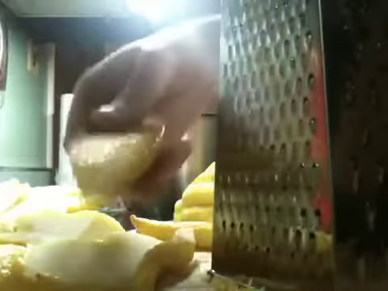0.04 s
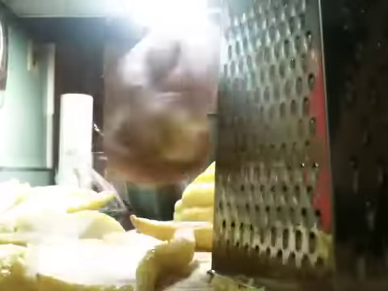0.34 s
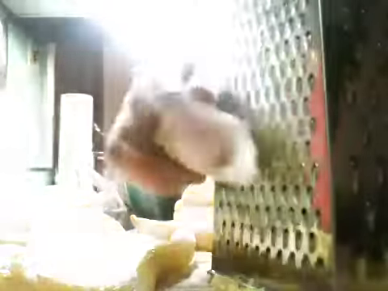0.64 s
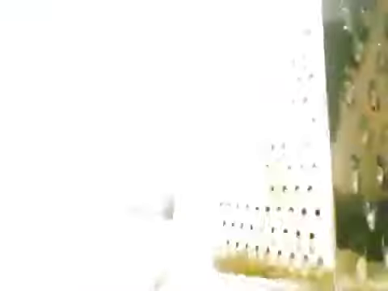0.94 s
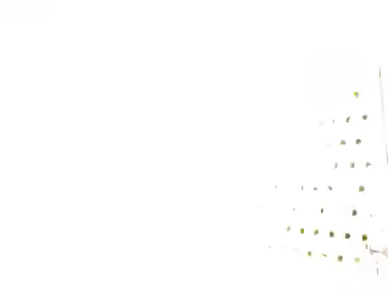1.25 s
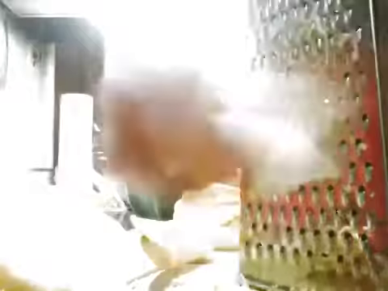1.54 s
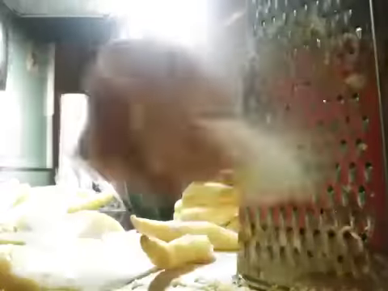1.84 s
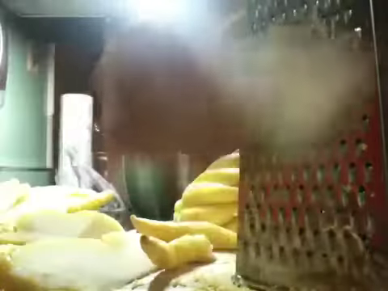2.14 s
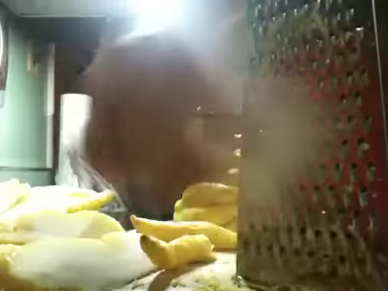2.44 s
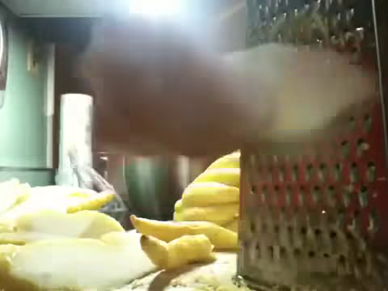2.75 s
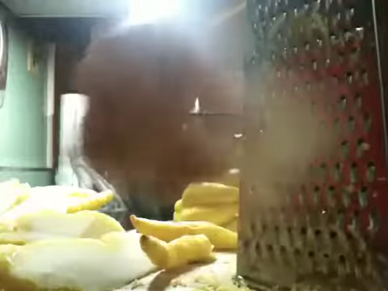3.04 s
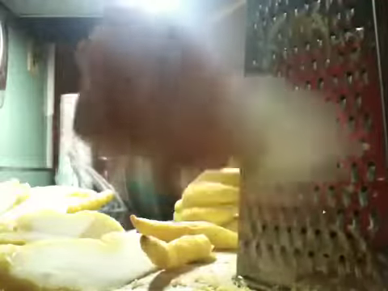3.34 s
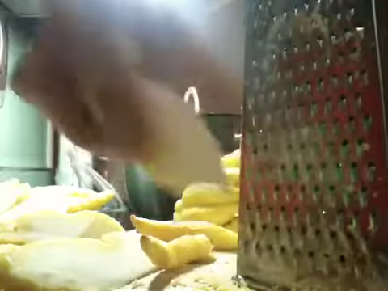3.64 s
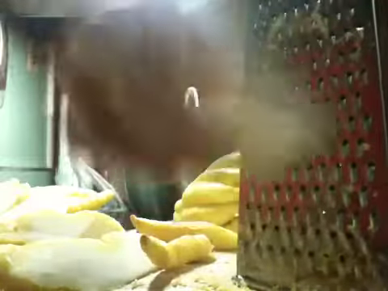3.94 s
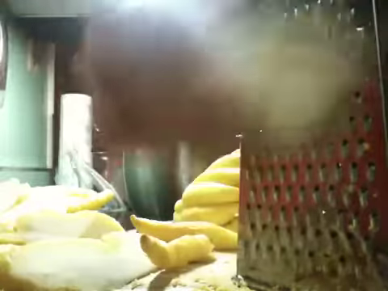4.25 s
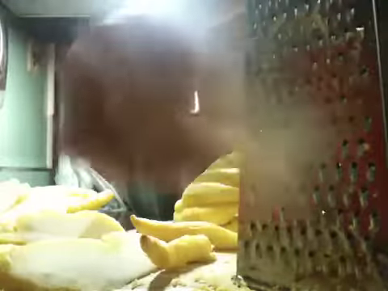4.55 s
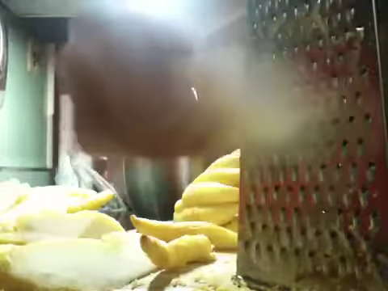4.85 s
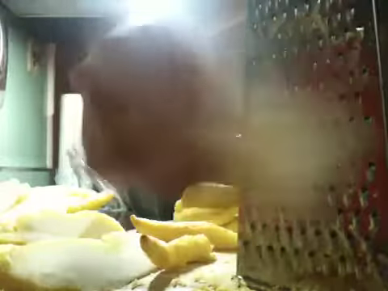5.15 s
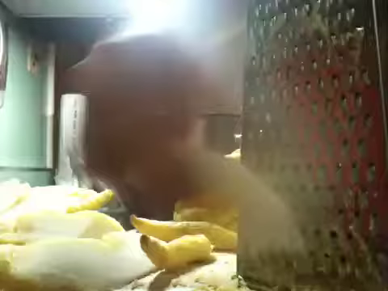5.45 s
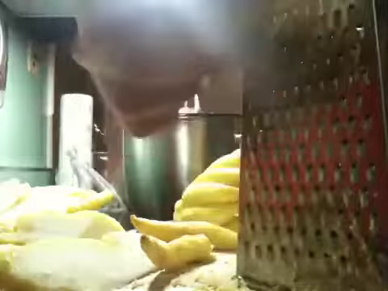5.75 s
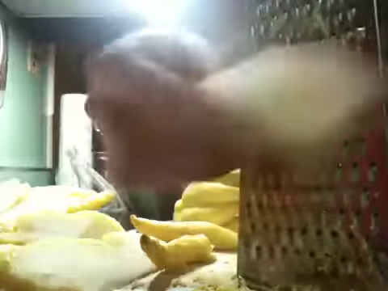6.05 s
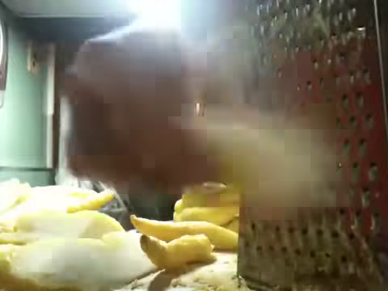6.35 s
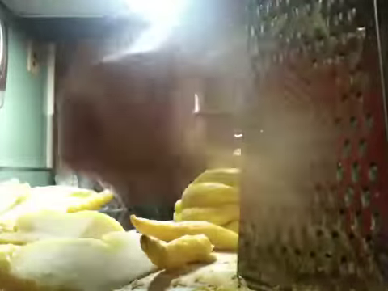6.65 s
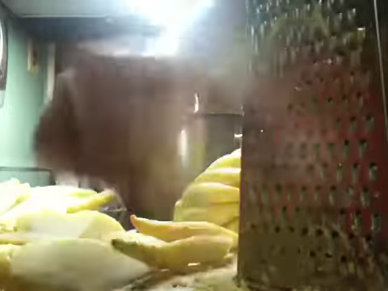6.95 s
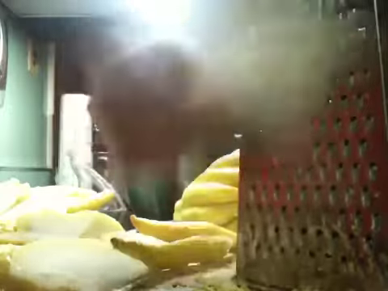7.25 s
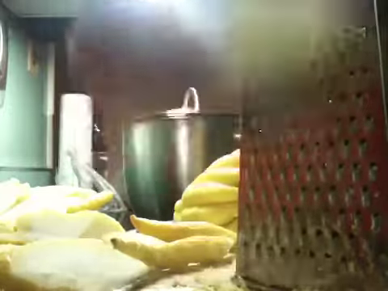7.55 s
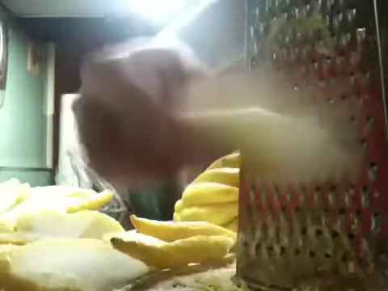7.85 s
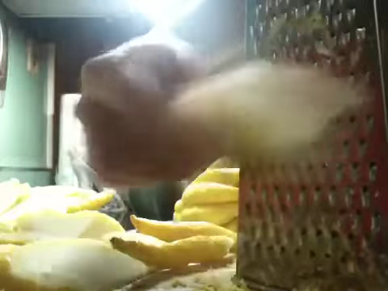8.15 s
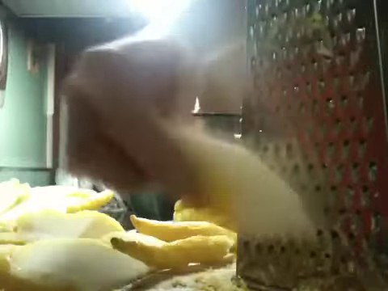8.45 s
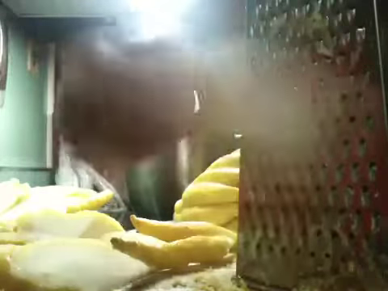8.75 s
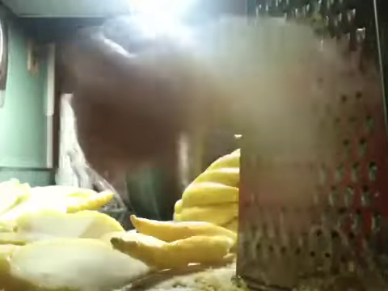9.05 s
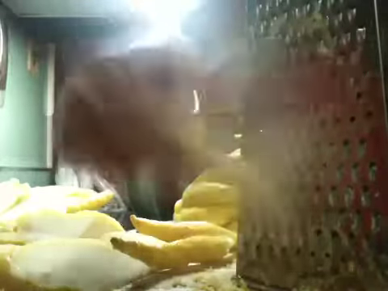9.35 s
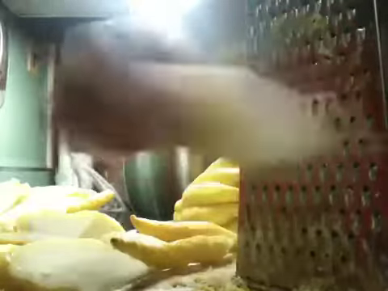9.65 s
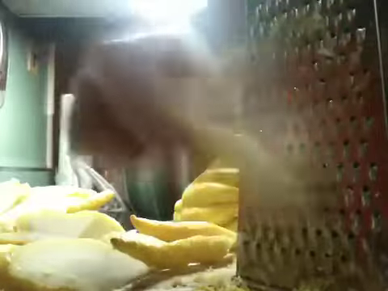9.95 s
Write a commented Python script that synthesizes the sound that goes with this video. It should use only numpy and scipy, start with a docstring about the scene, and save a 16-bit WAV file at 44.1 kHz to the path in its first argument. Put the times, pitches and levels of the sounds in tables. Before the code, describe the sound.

Citrus peel is rasped against a steel box grater in quick strokes, then single swipes, close up over a faint appliance hum.

```python
"""An appliance hums in a small kitchen; then, close to one microphone, citrus peel is zested on a steel
box grater on the counter: rubbed up and down without leaving the steel, then mostly in single swipes.
Each row of teeth tears the rind in a spray of tiny fractures; the thin walls ring, and the tugging
makes the whole box thrum. Down strokes cut and sound bright; up strokes slide over the backs of the
teeth and knock hollow. The room answers softly behind the direct sound."""
import sys
import numpy as np
from scipy import signal
from scipy.fft import rfft, irfft
from scipy.io import wavfile
from scipy.ndimage import map_coordinates

SR = 44100
rng = np.random.default_rng(int(sys.argv[2]) if len(sys.argv) > 2 else 0)


def int16_out(signal):
    """Quantize to a 16-bit WAV file."""
    q = np.round(np.clip(np.atleast_2d(signal).T, -1, 1) * 32767)
    wavfile.write(sys.argv[1], SR, q.astype(np.int16))


N = 440118
SPAN = 16384  # samples for one stroke and its ring
T, HZ = np.arange(SPAN) / SR, np.fft.rfftfreq(SPAN, 1 / SR)

# broad colour of the rasp at the teeth: f/Hz, level/dB
RASP_COLOUR = [(500, -67), (1300, -7), (2000, -6), (3200, -0.5), (4200, 0), (6000, -1.5), (7700, -2.5),
               (9500, -6), (10900, -9), (12200, -6.5), (15500, -11.5)]
# broad colour of the clattering wall: f/Hz, level/dB
CLATTER_COLOUR = [(250, -48), (560, 0), (750, -1), (1100, -3), (1450, -4), (1680, -12), (2300, -11),
                  (5000, -43)]


def amp(db):
    return 10 ** (np.asarray(db) / 20)


def unit(x):
    return x / np.sqrt(np.mean(x ** 2) + 1e-30)


def along(points, hz):
    """Read (f/Hz, value) points at hz, on a log axis."""
    f, values = np.transpose(points)
    return np.interp(np.log(hz + 1), np.log(f + 1), values)


def wobble(rate, size):
    """A smooth random curve, rate knots a second."""
    knots = rng.standard_normal(size // 100)
    return map_coordinates(knots, [np.arange(size) * rate / SR], mode="wrap")


def through(x, response):
    """x sent through an impulse response, cut to the length of x."""
    return signal.fftconvolve(x, response)[:len(x)]


def add(track, start_s, x):
    part = track[round(start_s * SR):][:len(x)]
    part += x[:len(part)]


def room_tone(air_db, hum_gain_db):
    """Steady kitchen air and, behind the grater, the slightly unsteady hum of an appliance."""
    # spectrum of the room noise: f/Hz, level/dB
    air_colour = [(15, -74), (25, -56), (113, -17), (156, -13), (188, -5.5), (274, -12.5), (305, -5),
                  (389, -12), (433, -8.5), (509, -19), (826, -22.5), (895, -25.5), (1140, -25.5),
                  (1490, -29), (15500, -36.5)]
    # tones of the appliance: f/Hz, level/dB
    hum_tones = [(60, -106), (120, -84), (197, -78.5), (302, -72), (312.6, -70), (414.9, -95),
                 (432.9, -75.5), (1001, -93), (1061, -97), (1120, -85), (1179, -87.5)]
    hz, t = np.fft.rfftfreq(N, 1 / SR), np.arange(N) / SR
    air = unit(irfft(rfft(rng.standard_normal(N)) * amp(along(air_colour, hz)), N))
    hum = np.zeros(N)
    for f, db in hum_tones:
        phase = 2 * np.pi * (f * t + rng.random()) + 0.77 * wobble(4.9, N)
        hum += amp(db) * np.sqrt(2) * np.sin(phase)
    return amp(air_db) * air + amp(hum_gain_db) * hum


def kitchen(x, wet_db, delay_s=0.0091):
    """The direct sound reaches the microphone first, then the room's answer, shorter in the treble."""
    # reverberation of the kitchen: f/Hz, t60/s
    decay_times = [(150, 0.5), (400, 0.41), (1000, 0.21), (3000, 0.31), (8000, 0.3), (15000, 0.051)]
    hz, t, noise = signal.stft(rng.standard_normal(SPAN), SR, nperseg=256)
    decay = amp(-60 * t / along(decay_times, hz)[:, None])
    tail = signal.istft(noise * decay, SR, nperseg=256)[1][:SPAN]
    tail *= T > delay_s
    return x + amp(wet_db) * through(x, tail / np.linalg.norm(tail))


def squeaks():
    """The wet rind sticks and slips on the steel for a few rough cycles, too short to become a note."""
    # squeaks: t/s, f/Hz, length/s, relative level/dB
    slips = [(4.339, 1270, 0.015, -54), (5.979, 1307, 0.01, -40), (6.658, 1200, 0.02, -41.5),
             (6.893, 1350, 0.012, -48.5)]
    track = np.zeros(N)
    for start, hz, length, db in slips:
        unsteady_hz = hz * (1 + 0.1 * wobble(350, SPAN))
        slip = np.sin(2 * np.pi * np.cumsum(unsteady_hz) / SR)
        swell = np.sqrt(np.abs(np.sin(np.pi * np.minimum(T / length, 1))))
        add(track, start, kitchen(amp(db + 5) * swell * slip, wet_db=-10))
    return track


def grater(colour, bass_db=0, bass_hz=225, grip_db=1.5):
    """Impulse response of the steel; the pressing peel damps its resonances differently at each touch."""
    # resonances of the grater: f/Hz, width/Hz, lift/dB
    resonances = [(123.4, 11, 3), (203, 100, -1), (253, 69, 4.5), (316, 14, 6.5), (389, 8.8, 7.5),
                  (437.6, 56, 4), (770, 74, 5.5), (959, 54, 11), (1045, 20, 6.5), (1228, 67, 7),
                  (1402, 15, 11.5), (1510, 74, 10), (1767, 57, 11.5), (2133, 23, 8), (2472, 38, 11),
                  (2980, 320, 8), (3467, 94, 11), (3800, 32, 10), (4500, 100, 6.5), (4830, 26, 8.5),
                  (5200, 71, 7.5), (5940, 270, 5.5), (6170, 200, 5.5), (6900, 260, 3.5), (7730, 49, 5.5)]
    power = np.ones(len(HZ))
    for f, width, db in resonances:
        peak = amp(db + grip_db * rng.standard_normal()) ** 2 - 1
        power += peak / (1 + (2 * (HZ - f) / width) ** 2)
    bass_shelf = amp(bass_db / (1 + (HZ / bass_hz) ** 8))
    magnitude = amp(along(colour, HZ)) * bass_shelf * np.sqrt(np.maximum(power, 0.5))
    # minimum phase: the steel rings only after it is touched
    cepstrum = irfft(np.log(magnitude))
    fold = 1 + np.sign(SPAN / 2 - np.arange(SPAN))
    fold[0] = 1
    return irfft(np.exp(rfft(cepstrum * fold)))


def shimmer(x, t60, share, paths=4, dwell_s=0.007):
    """Bending waves scatter round the perforated sheet, differently from each tooth the peel passes."""
    tails = rng.standard_normal((paths, SPAN // 4)) * amp(-60 * T[:SPAN // 4] / t60)
    tails *= share / np.linalg.norm(tails, axis=1, keepdims=True)
    tails[:, 0] += 1  # the direct wave
    touched = (T // dwell_s) % paths == np.arange(paths)[:, None]
    return signal.fftconvolve(x * touched, tails, axes=1).sum(0)[:SPAN]


def teeth(rate, uneven, scatter_db, release_s):
    """Force on the teeth: the rind catches on one row after another, and each catch tears away."""
    rows_per_s = rate * np.exp(uneven * wobble(70, SPAN))
    rows_passed = np.floor(rng.random() + np.cumsum(rows_per_s) / SR)
    catches = np.diff(rows_passed, prepend=0) > 0
    return through(catches * amp(scatter_db * rng.standard_normal(SPAN)), np.exp(-T / release_s))


def fractures(rate, scatter_db):
    """Tiny cracks of bursting rind cells, rate a second."""
    cracks = (rng.random(SPAN) < rate / SR) * rng.choice([-1, 1], SPAN)
    return cracks * amp(scatter_db * rng.standard_normal(SPAN))


def pressure(rise_s, hold_s, fall_s, landing_db, lag_s=0):
    """The soft peel lands, the hand bears down, holds and lets go, easing by 20 dB in fall_s."""
    t = np.maximum(T - lag_s * np.minimum(T / rise_s, 1), 0)
    bearing_db = landing_db * np.maximum(1 - t / rise_s, 0) ** 2
    easing_db = -20 * (np.maximum(t - rise_s - hold_s, 0) / fall_s) ** 2
    return amp(bearing_db + easing_db) * (1 - np.exp(-T / 0.0025))


def rubbed(push, grain, body, t60, share):
    """Grain under the hand's push rings the steel, with as much energy as the push carries."""
    ring = through(shimmer(push * grain, t60, share), body)
    return unit(ring) * np.sqrt(np.mean(push ** 2))


def spray(push):
    """Zest oil spits from bursting cells: a dry, bright sizzle, straight through the air."""
    # spectrum of the sizzle: f/Hz, level/dB
    sizzle_colour = [(2000, -40), (5000, -7), (8000, 4), (12000, -5.5), (15500, -8.5)]
    droplets = fractures(rate=18000, scatter_db=1.5)
    return push * unit(irfft(rfft(droplets) * amp(along(sizzle_colour, HZ))))


def snags():
    """A tooth snags hard and rips free in one short burst of fractures."""
    # snags: t/s, level/dB
    rips = [(1.362, -38.5), (1.404, -36.5), (1.449, -31), (1.615, -40.5), (1.668, -32), (1.876, -28.5),
            (1.892, -34.5), (2.311, -38), (2.521, -41), (2.567, -34), (2.956, -41), (3.147, -47),
            (4.091, -55), (4.378, -39), (4.398, -38.5), (4.578, -36.5), (4.81, -38.5), (4.858, -46),
            (5.052, -34), (5.073, -38.5), (5.291, -38), (5.313, -44), (5.48, -40), (5.512, -31),
            (6.212, -39), (6.446, -32), (6.663, -33), (7.386, -35.5), (7.418, -30), (7.876, -35),
            (8.291, -32), (9.178, -41), (9.387, -38)]
    track = np.zeros(N)
    rip = np.exp(-T / 0.0039) * (1 - np.exp(-T / 0.00051))
    for start, db in rips:
        burst = fractures(rate=12000, scatter_db=2)
        crack = rubbed(rip, burst, grater(RASP_COLOUR), t60=0.026, share=1.3)
        knock = rubbed(rip, burst, grater(CLATTER_COLOUR), t60=0.05, share=0.69)
        snag = crack + amp(-10.5) * knock + amp(-26) * spray(rip)
        add(track, start, amp(db) * kitchen(snag, wet_db=-18.5))
    return track


def flick(db):
    """The peel slips off the teeth; let go, the wall rings hollow for a moment."""
    # modes of the freed wall: f/Hz, level/dB, t60/s
    wall_modes = [(237, -20, 0.16), (306, -7, 0.18), (367.5, -3, 0.14), (425.7, 1.5, 0.13),
                  (507, -2.5, 0.11), (657, -11, 0.094), (783, -8.5, 0.23), (948, -23, 0.046)]
    ring = np.zeros(SPAN)
    for hz, mode_db, t60 in wall_modes:
        decay = amp(mode_db + rng.normal(0, 1.1) - 60 * T / t60)
        ring += decay * np.sin(2 * np.pi * (hz * T + rng.random()))
    return kitchen(amp(db) * ring * (1 - np.exp(-T / 0.00087)), wet_db=-18.5)


def bass_at(t):
    """How deep the box thrums at this moment, in dB."""
    # bass in the thrum, drifting from stroke to stroke: t/s, level/dB
    bass_drift = [(1.4, 4), (2.5, 0.5), (3.3, -8), (4.1, 8), (5.3, 1.5), (6.6, -1), (7.4, 2), (7.9, -1),
                  (8.6, 2), (9.8, -3)]
    return np.interp(t, *np.transpose(bass_drift))


def stroke(shape, rasp_db, wall_db, box_db, bass_db):
    """One stroke rasps at the teeth, rattles the wall and, a little later, shakes the box."""
    # broad colour of the thrumming box: f/Hz, level/dB
    thrum_colour = [(25, -22), (55, -20.5), (85, -11), (125, -6.5), (190, 1.5), (280, 1), (420, 0.5),
                    (490, -3), (580, -13), (1200, -22.5), (3000, -68.5)]
    sheet, wall, box = grater(RASP_COLOUR), grater(CLATTER_COLOUR), grater(thrum_colour, bass_db)
    judder = amp(2.1 * wobble(85, SPAN))  # the lumpy peel rides up and digs in again
    catches = unit(teeth(rate=150, uneven=0.4, scatter_db=4, release_s=0.0021))
    bite = unit(judder * (1.5 + catches))
    push = pressure(*shape)
    fine_grain = bite * fractures(rate=11000, scatter_db=2.5)
    rasp = rubbed(push, fine_grain, sheet, t60=0.043, share=1.05)
    rasp += amp(-11) * spray(push * bite * amp(4.7 * wobble(63, SPAN)))
    medium_grain = bite * fractures(rate=3500, scatter_db=1)
    clatter = rubbed(pressure(*shape, lag_s=0.0012), medium_grain, wall, t60=0.086, share=0.9)
    coarse_grain = bite * fractures(rate=1500, scatter_db=2.5)
    thrum = rubbed(pressure(*shape, lag_s=0.0014), coarse_grain, box, t60=0.037, share=0.48)
    return (amp(rasp_db) * kitchen(rasp, wet_db=-22)
            + amp(wall_db) * kitchen(clatter, wet_db=-15.5)
            + amp(box_db) * kitchen(thrum, wet_db=-10))


def half_rub(half, start, length, rasp_db, effort_db):
    """A stroke that swells from one turn of the hand and fades into the next."""
    rise, hold, fall, turn_db, wall_db, box_db, bass_db = half
    shape = (rise * length, hold * length, fall * length, turn_db)
    return stroke(shape, rasp_db, wall_db + effort_db, box_db + effort_db, bass_db + bass_at(start))


def rubs(up_flick_db=-44, flick_after_s=0.033):
    """The peel slides up, at times flicking the wall, and cuts down; harder rubs shake the box more."""
    # rubs: t/s, up length/s, down length/s, up rasp/dB, down rasp/dB
    rub_cycles = [(1.255, 0.11, 0.12, -62.5, -43), (1.51, 0.11, 0.12, -57, -41.5),
                  (1.744, 0.097, 0.13, -53.5, -42), (1.975, 0.095, 0.1, -51, -40.5),
                  (2.191, 0.085, .12, -53.5, -41.5), (2.399, 0.1, 0.11, -53.5, -41),
                  (2.631, 0.076, 0.13, -52.5, -43), (2.838, 0.081, 0.11, -52, -42.5),
                  (3.035, 0.078, 0.11, -51.5, -42.5), (3.23, .074, 0.12, -52.5, -46.5),
                  (3.415, 0.067, 0.087, -55, -46), (4.458, .1, 0.11, -56, -49.5),
                  (6.279, 0.11, 0.14, -49.5, -44.5), (8.175, .083, 0.09, -49.5, -43.5)]
    # each half of a rub: rise/share, hold/share, fall/share, push at turn/dB, wall/dB, box/dB, bass/dB
    up_half = (0.46, .14, 0.33, -7.5, -51.5, -50, 0.5)
    down_half = (0.3479, 0.1047, 0.4944, -23.5, -47, -48, 1.5)
    track = np.zeros(N)
    usual_up_db, usual_down_db = np.mean(rub_cycles, axis=0)[-2:]
    for start, up_s, down_s, up_db, down_db in rub_cycles:
        turn = start + up_s
        up_effort_db, down_effort_db = 0.99 * (up_db - usual_up_db), 0.27 * (down_db - usual_down_db)
        add(track, start, half_rub(up_half, start, up_s, up_db, up_effort_db))
        add(track, turn, half_rub(down_half, turn, down_s, down_db, down_effort_db))
        if 1.95 < start < 3.35:  # at its firmest, the peel hooks on the way up and slips free
            add(track, start + flick_after_s, flick(up_flick_db))
    return track


def swipes(attack_share=0.74, lift_off_s=0.03, damping_db_per_s=222):
    """Two faint handling touches, then single down strokes; longer contact damps the lift-off ring."""
    # touches and swipes: t/s, time to lift-off/s, landing against full push/dB, rasp/dB, body/dB
    contacts = [(1.095, 0.11, -1.5, -69, -77), (1.222, 0.03, 8.5, -65, -60), (4.065, 0.067, -8, -58, -54.5),
                (4.334, 0.072, 2.5, -54, -50.5), (4.801, 0.047, 0, -52.5, -54),
                (5.048, 0.033, -9, -51, -46.5), (5.269, .041, -7.5, -63, -47.5),
                (5.477, 0.064, -12, -47.5, -45.5), (5.967, 0.051, 0, -41.5, -44.5),
                (6.173, 0.057, -2.5, -49, -48), (6.641, 0.065, -6.5, -44.5, -44.5),
                (6.891, 0.038, -1, -42.5, -45.5), (7.351, 0.087, 2, -49.5, -48),
                (7.846, 0.057, 2, -41.5, -42.5), (8.048, 0.069, -8, -45.5, -49.5),
                (8.495, 0.041, -5.5, -46, -47.5), (8.732, 0.03, 2, -44.5, -49),
                (8.93, 0.034, -7, -46.5, -47.5), (9.157, 0.022, 1.5, -42.5, -43.5),
                (9.363, 0.026, 2.5, -47.5, -47), (9.582, 0.039, 1.5, -43, -46.5),
                (9.792, .035, -5.5, -54.5, -49)]
    track = np.zeros(N)
    for start, length, landing_db, rasp_db, body_db in contacts:
        attack = attack_share * length
        shape = (attack, length - attack, lift_off_s, landing_db)
        add(track, start, stroke(shape, rasp_db, body_db - 0.5, body_db, bass_at(start)))
        add(track, start + length, flick(body_db + 10 - damping_db_per_s * length))
    return track


def scene():
    """The grater close up, the room tone behind it, in mono."""
    zesting = rubs() + swipes() + snags() + squeaks()
    return (zesting + room_tone(air_db=-65.5, hum_gain_db=-2))[None]


def record(dry, silence_s=(1.179, 1.224), top_hz=15850):
    """The sound cuts to silence for a moment and holds nothing above top_hz."""
    t = np.arange(N) / SR
    live = (t < silence_s[0]) | (t > silence_s[1])
    in_band = np.fft.rfftfreq(N, 1 / SR) < top_hz
    return irfft(rfft(dry * live) * in_band, N)


dry = scene()
out = record(dry)
int16_out(out)
```